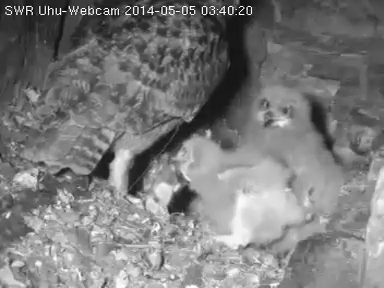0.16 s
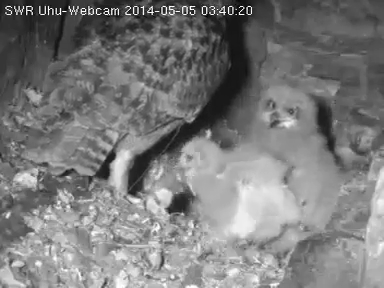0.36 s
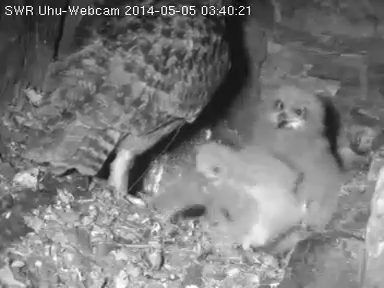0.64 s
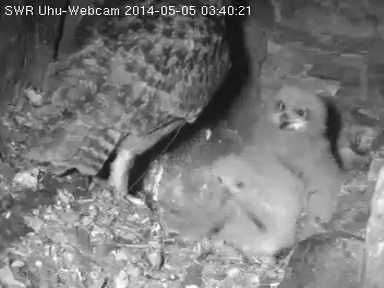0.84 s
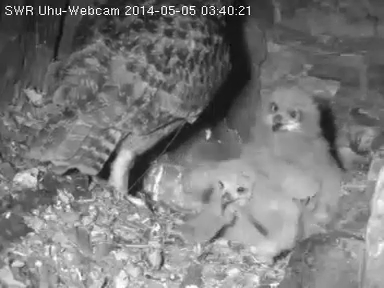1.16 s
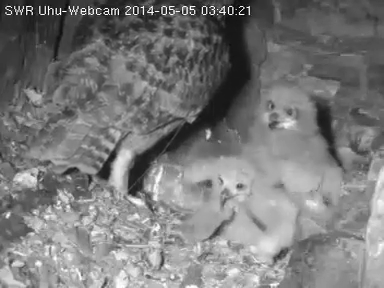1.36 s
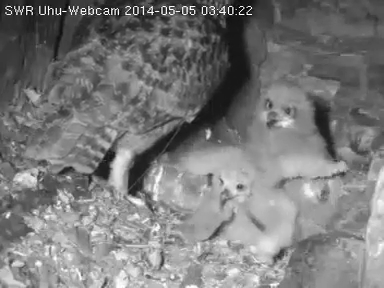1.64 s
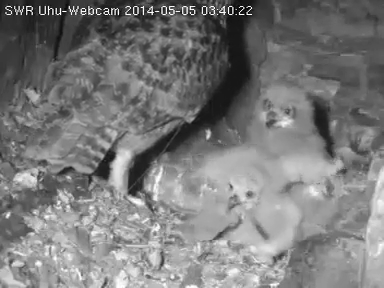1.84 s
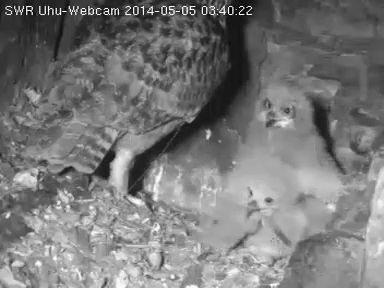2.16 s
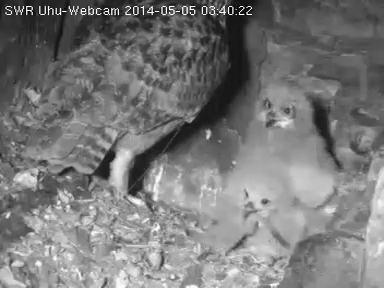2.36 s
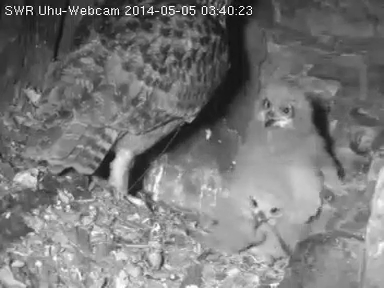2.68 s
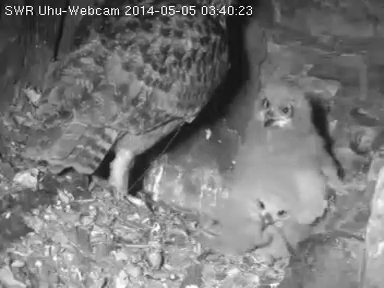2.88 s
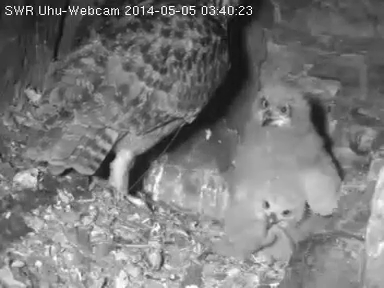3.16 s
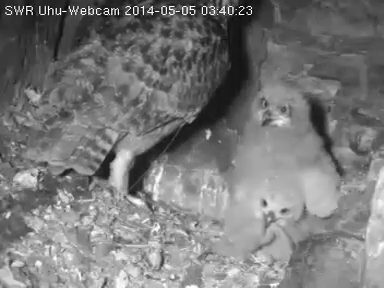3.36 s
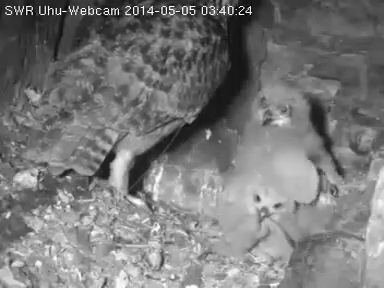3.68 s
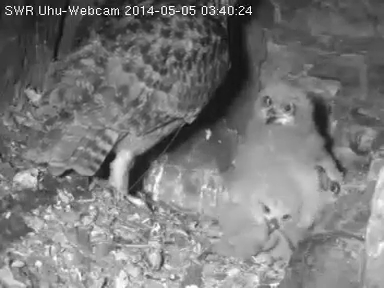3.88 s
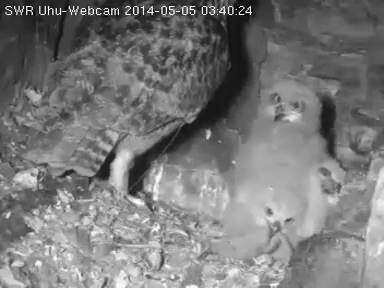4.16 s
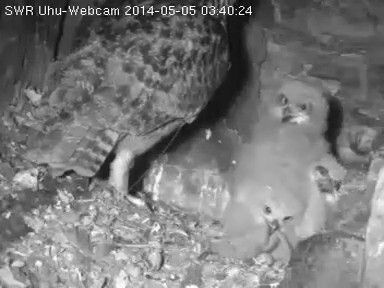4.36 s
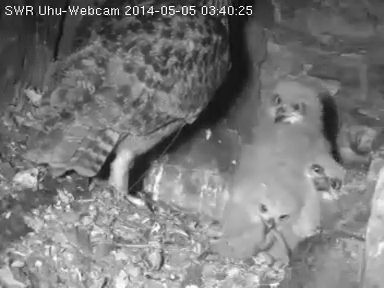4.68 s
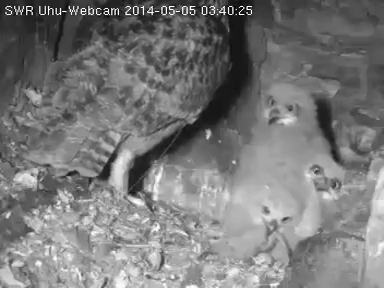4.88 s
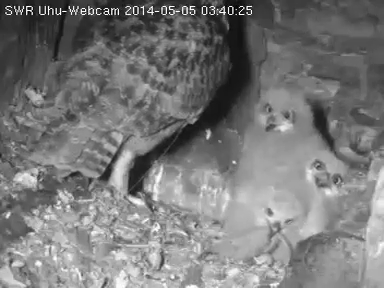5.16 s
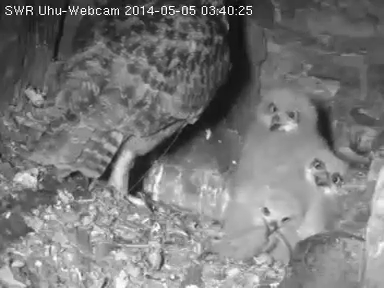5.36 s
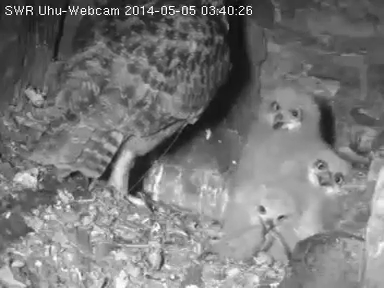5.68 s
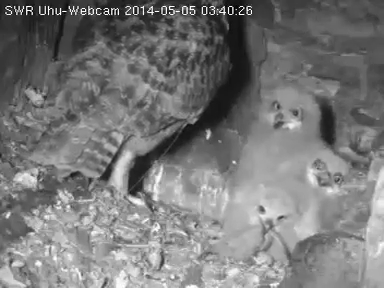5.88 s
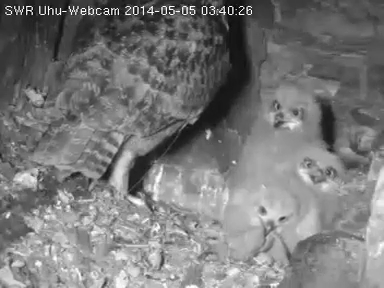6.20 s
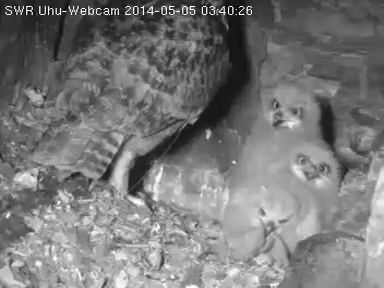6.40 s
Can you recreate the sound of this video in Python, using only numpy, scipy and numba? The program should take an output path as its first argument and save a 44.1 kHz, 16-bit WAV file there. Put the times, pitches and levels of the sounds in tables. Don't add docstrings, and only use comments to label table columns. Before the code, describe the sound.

Owl chicks beg in a close rock nest at night. A couple of soft foot thuds and a faint feather rustle come first, then one loud, raspy screech that swells and closes on a falling whistle. After a pause another chick twitters four tiny high squeaks with hoarse croaks, and a second rasp follows. A cheap surveillance microphone adds constant low hum and dull hiss.

```python
import sys
import numpy as np
from scipy import signal
from scipy.fft import rfft, irfft, next_fast_len
from scipy.io import wavfile
from scipy.ndimage import uniform_filter1d
from numba import njit

SR = 44100
rng = np.random.default_rng(int(sys.argv[2]) if len(sys.argv) > 2 else 0)


def nominal_scale(level):
    x = np.asarray(level, float) / 20
    return 10 ** x


def unload_wav(signal):
    wavfile.write(
        sys.argv[1],
        SR,
        np.round(np.clip(np.atleast_2d(signal).T, -1, 1) * 32767).astype(np.int16),
    )


N = 288061


def rms_one(x):
    return x / np.sqrt(np.mean(x ** 2) + 1e-20)


def in_time(rows):
    s, *columns = np.transpose(rows)
    at = np.arange(int(s[0] * SR), int(s[-1] * SR))
    return at, [np.interp(at / SR, s, column) for column in columns]


def at_hz(points, hz):
    points = np.array(points)
    return np.interp(np.log(hz), np.log(points[:, 0]), points[:, 1])


def colour(x, points):
    size = next_fast_len(x.shape[-1])
    hz = np.arange(size // 2 + 1) * SR / size + 1e-3
    shaped = irfft(rfft(x, size) * nominal_scale(at_hz(points, hz)), size)
    return shaped[..., :x.shape[-1]]


def flutter(size, hz):
    r = np.exp(-2 * np.pi * hz / SR)
    noise = rng.standard_normal(size + 500)
    return rms_one(signal.lfilter([1], [1, -2 * r, r * r], noise)[500:])


@njit
def resonate(x, hz, r):
    y = np.zeros(len(x))
    for i in range(2, len(x)):
        drive = (1 - r * r) / 2 * (x[i] - x[i - 2])
        y[i] = drive + 2 * r * np.cos(2 * np.pi * hz[i]) * y[i - 1] - r * r * y[i - 2]
    return y


def steady_ring(x, hz, width_hz):
    return resonate(x, np.full(len(x), hz / SR), np.exp(-np.pi * width_hz / SR))


def twice(x, hz, width_hz):
    r = np.exp(-np.pi * 1.5 * width_hz / SR)
    return rms_one(resonate(resonate(x, hz / SR, r), hz / SR, r))


def glides(rows, attack, release, sag_db, edge_db, bend):
    u = np.linspace(0, 1, 41)
    swell_db = np.interp(u, [0, attack, 1 - release, 1], [edge_db, 0, sag_db, sag_db + edge_db])
    return [np.transpose([s + length * u, from_hz + (to_hz - from_hz) * u ** bend, peak_db + swell_db])
            for s, length, from_hz, to_hz, peak_db in rows]


def sing(tables, overtones, step_db, shrill_db, shimmer_db, jitter):
    out = np.zeros(N)
    for rows, extra_db in zip(tables, np.broadcast_to(shrill_db, len(tables))):
        at, (hz, level_db) = in_time(rows)
        hz = uniform_filter1d(hz, size=130, mode="nearest")
        hz = hz * (1 + jitter * flutter(len(at), 280))
        phase = 2 * np.pi * np.cumsum(hz) / SR
        wave = np.sin(phase)
        waver_db = np.clip(5.5 * flutter(len(at), 500), -9, 5)
        for k in range(2, 5):
            multiple_db = at_hz(overtones, k * hz) + step_db * (k - 2) + extra_db + waver_db
            wave += nominal_scale(multiple_db) * np.sin(k * phase)
        out[at] += np.sqrt(2) * nominal_scale(level_db + shimmer_db * flutter(len(at), 450)) * wave
    return out


def background():
    # multiple of the mains pitch, level in dB rms.
    hum_tones = [(1, -74), (3, -65), (5, -82), (9, -75), (13, -82)]
    # pitch in Hz, hiss strength in dB per Hz.
    hiss_colour = [(22, -19.5), (45, -5), (90, -4.5), (135, -5), (175, 3), (225, -8.5), (350, -5),
                   (460, -2), (560, -6), (700, -9), (1080, -7.5), (1600, -12.5), (3000, -18), (6500, -22)]
    mains_hz, hiss_db = 50.0, -62.5
    t = np.arange(N) / SR
    hum = np.zeros(N)
    for multiple, tone_db in hum_tones:
        turns = round(multiple) * mains_hz * t + rng.random()
        hum += np.sqrt(2) * nominal_scale(tone_db) * np.sin(2 * np.pi * turns)
    hiss = colour(rng.standard_normal(N), hiss_colour)
    hiss = colour(hiss, [(9000, 6.5), (10000, -49)])
    return hum + nominal_scale(hiss_db) * rms_one(hiss)


def thuds():
    # start in seconds, ring in Hz, peak in dB, time to fall by 60 dB in seconds.
    bumps = [
        (.523, 175, -46, .1),
        (.523, 290, -48, .05),
        (.523, 115, -52, .07),
        (.562, 165, -49, .09),
        (.75, 190, -54, .08),
        (.795, 80, -60, .1),
        (.858, 180, -54, .07),
        (4.11, 178, -55, .08),
    ]
    out = np.zeros(N)
    for s, ring_hz, peak_db, t60 in bumps:
        t = np.arange(int(t60 * SR)) / SR
        swell = nominal_scale(peak_db - 60 * t / t60) * (1 - np.exp(-t / .002))
        out[int(s * SR):][:len(t)] += swell * np.sin(2 * np.pi * ring_hz * t)
    return out


def feathers():
    # start in seconds, length in seconds.
    rustle_times = [
        (.738, .025),
        (.775, .065),
        (.73, .14),
    ]
    # centre in Hz, width in Hz, level in dB.
    rustle_colours = [
        (6018.5, 2000, -63.5),
        (3000, 2600, -62.5),
        (343, 260, -60.5),
    ]
    out = np.zeros(N)
    for (s, length), (centre_hz, width_hz, level_db) in zip(rustle_times, rustle_colours):
        size = int(length * SR)
        grains = rng.standard_normal(8000)[:size] * nominal_scale(3.0 * flutter(8000, 200)[:size])
        swell = rms_one(steady_ring(grains, centre_hz, width_hz)) * np.hanning(size)
        out[int(s * SR):][:size] += nominal_scale(level_db) * swell
    return out


def squeaks():
    # time in seconds, pitch in Hz, level in dB.
    held = [
        (3.6535, 3000, -60),
        (3.655, 3040, -38),
        (3.6685, 2900, -37),
        (3.672, 2790, -46),
        (3.6755, 2700, -37),
        (3.685, 2790, -37.5),
        (3.692, 3350, -33),
        (3.6955, 3900, -49),
        (3.7, 4500, -63),
    ]
    # start in seconds, length in seconds, from Hz, to Hz, peak in dB.
    drops = [
        (3.778, .026, 3810, 2237, -39),
        (3.8965, .022, 3920, 2274, -36),
        (4.016, .018, 3600, 2170, -41),
    ]
    flicks = [
        (3.807, .015, 2760, 4760, -37.5),
        (3.933, 0.017, 2720, 4670, -35),
    ]
    shrillness = [-10, -4, -2]
    # pitch in Hz, level in dB against the basic tone.
    overtones = [(4600, -11), (5400, -23), (6200, -9), (6900, -23), (7500, -15), (8300, -5.5)]
    tables = [held]
    tables += glides(drops, attack=.2, release=.12, sag_db=-14, edge_db=-20, bend=.55)
    tables += glides(flicks, attack=.2, release=.45, sag_db=-6, edge_db=-24, bend=1.4)
    shrill_db = np.repeat(shrillness, [1, len(drops), len(flicks)])
    return sing(tables, overtones, -22, shrill_db, shimmer_db=.8, jitter=.005)


def croaks():
    # start in seconds, length in seconds, from Hz, to Hz, peak in dB.
    croak_notes = [
        (3.917, .016, 1780, 1700, -53),
        (3.918, .014, 3350, 3480, -57),
        (4.032, .03, 1800, 1600, -47),
        (4.034, .042, 2120, 1730, -47),
        (4.042, .018, 900, 870, -60),
        (4.036, .04, 4100, 3300, -56),
    ]
    # pitch in Hz, level of a multiple in dB against the basic tone.
    overtones = [(1800, -5), (3400, -10), (4200, -10), (5200, -23), (6300, -20)]
    tables = glides(croak_notes, attack=.2, release=.3, sag_db=-4, edge_db=-13, bend=1.3)
    return sing(tables, overtones, -4.5, 0, shimmer_db=2.2, jitter=.03)


def whistles():
    # start in seconds, length in seconds, from Hz, to Hz, peak in dB.
    openings = [
        (1.069, .027, 1500, 2280, -44),
        (4.912, .035, 1500, 2420, -47),
    ]
    closings = [
        (1.412, .029, 1680, 1200, -36),
        (5.255, .031, 1690, 1180, -35),
        (5.289, .012, 1080, 900, -58),
    ]
    strands = [
        (1.084, .016, 2600, 3500, -44),
        (1.155, .07, 5200, 5020, -51),
        (1.385, .029, 2830, 2450, -34),
        (4.933, .042, 2900, 4450, -45),
        (4.955, .035, 2500, 3000, -44),
        (5.215, .046, 2860, 2360, -34),
    ]
    chest_strands = [
        (4.96, .11, 760, 760, -51),
        (4.98, .05, 950, 950, -50),
        (5.1, .08, 960, 840, -45),
        (5.08, .15, 1220, 1120, -48),
    ]
    # pitch in Hz, level in dB against the basic tone.
    overtones = [(2400, -16.5), (2800, -7), (3200, -4), (3600, -10), (4300, -11.5), (5000, -20), (6400, -8),
                 (8000, -19.5)]
    step_db = -18
    ends = glides(openings, attack=.22, release=.25, sag_db=.5, edge_db=-20, bend=.7)
    ends += glides(closings, attack=.25, release=.2, sag_db=-7, edge_db=-14, bend=1.05)
    locked = dict(attack=.35, release=.25, sag_db=.5, edge_db=-14, bend=1.2)
    out = sing(ends, overtones, step_db, -2, shimmer_db=1.5, jitter=.006)
    out += sing(glides(strands, **locked), overtones, step_db, -14, shimmer_db=3.0, jitter=.015)
    out += sing(glides(chest_strands, **locked), overtones, step_db, -14, shimmer_db=2.5, jitter=.045)
    return out


def slapping_membrane(size):
    slaps_per_s, unevenness, breath = 1500, .5, .6
    gaps = SR / slaps_per_s * np.exp(unevenness * rng.standard_normal(2000))
    slaps = np.bincount(np.cumsum(gaps).astype(int))[:size]
    return rms_one(slaps - slaps.mean()) + breath * rng.standard_normal(size)


def tract(source, opening, modes):
    out = 0
    for k, (shut_hz, open_hz, width_hz, ring_db) in enumerate(modes):
        ring_hz = shut_hz + (open_hz - shut_hz) * opening
        out = out + (-1) ** k * nominal_scale(ring_db) * twice(source, ring_hz, width_hz)
    return out


def even(x):
    evening = .3
    power = uniform_filter1d(rms_one(x) ** 2, size=300)
    return rms_one(x / (power + .05) ** (evening / 2))


def rasps():
    # time in seconds, effort in dB, beak opening 0-1,
    # mouth ring in Hz set by the tongue.
    efforts = [
        [(1.078, -58, 0.77, 5370), (1.092, -43.5, 0.73, 5270), (1.14, -38, 0.71, 5220),
         (1.172, -40.5, 0.99, 5140), (1.244, -30, 0.83, 4960), (1.334, -26.5, 0.84, 4990),
         (1.408, -37, 0.35, 5030), (1.417, -47, .2, 4680)],
        [(4.922, -64, 0.019, 4170), (4.942, -38.5, .4, 4470), (4.962, -39, 1, 4420), (5.02, -33.5, 0.75, 5220),
         (5.142, -25.5, 0.98, 5040), (5.224, -31, 0.54, 5040), (5.24, -40.5, 0.96, 5300),
         (5.261, -48, 0.03, 4890)],
    ]
    # muffling in dB, clearing time in seconds,
    # nasal notch in Hz, notch depth 0-1 at the start, notch depth 0-1 at the end.
    clearing = [
        (-13, .09, 4780, .95, .1),
        (1, .09, 5820, .95, .7),
    ]
    # Hz beak shut, Hz beak open, width in Hz, level in dB.
    body = [(309, 333, 300, -0.15), (490, 670, 258, 0.15)]
    chest = [(750, 780, 76, -5), (920, 973, 150, -7), (1270, 1270, 220, -4.5), (1640, 1690, 380, 6),
             (2020, 1960, 390, -8.5)]
    throat_rings = [(2520, 2850, 270, 2.5), (3000, 3420, 320, -2.5)]
    pharynx = [(3700, 3950, 540, 0.5), (4080, 4220, 460, -0.5)]
    upper_rings = [(5670, 5660, 360, -6), (6540, 6900, 1730, -5)]
    # (dB at full effort, dB gained per dB below full effort)
    laws = [(-11.5, .19), (-9, .32), (-11.5, .4), (-24, .85)]
    full_db, mouth_db, mouth_width_hz = -25, 1.5, 310
    shut_db = -11.5
    notch_width_hz, notch_shuts_s = 300, .16
    out = np.zeros(N)
    for rows, (muffle_db, clear_s, notch_hz, first, last) in zip(efforts, clearing):
        at, (level_db, opening, mouth_hz) = in_time(rows)
        t = (at - at[0]) / SR
        opening = opening + .08 * flutter(len(at), 45)
        muffled_db = muffle_db * np.clip(1 - t / clear_s, 0, 1)
        slack_db = np.minimum(full_db - level_db, 16)
        pharynx_db, upper_db, chest_db, body_db = [full + gain * slack_db for full, gain in laws]
        source = slapping_membrane(len(at))

        mouth = nominal_scale(mouth_db + muffled_db) * twice(source, mouth_hz, mouth_width_hz)
        upper = mouth - tract(source, opening, upper_rings)
        throat = rms_one(tract(source, opening, throat_rings))
        throat = throat + nominal_scale(pharynx_db) * rms_one(tract(source, opening, pharynx))
        shutting_db = shut_db * (1 - opening) * (t > clear_s)
        voice = even(throat) + nominal_scale(upper_db + muffled_db + shutting_db) * even(upper)
        voice -= nominal_scale(chest_db) * even(tract(source, opening, chest))
        voice -= nominal_scale(body_db) * rms_one(tract(source, opening, body))

        depth = last + (first - last) * np.exp(-(t / notch_shuts_s) ** 4)
        voice -= np.clip(depth, 0, 1) * steady_ring(voice, notch_hz, notch_width_hz)
        edge = np.clip(np.minimum((at - at[0]) / .01, (at[-1] - at) / .003) / SR, 0, 1)
        surge_db = 1.1 * flutter(len(at), 76)
        out[at] += edge * nominal_scale(level_db + surge_db) * voice
    return out


def niche(x):
    t60 = .065
    t = np.arange(int(.15 * SR)) / SR
    tail = rng.standard_normal(len(t)) * nominal_scale(-60 * t / t60) * (t > .003)
    tail = colour(tail, [(1500, -14), (2950, -13), (3350, -1), (4000, -3), (4800, -6), (5400, -6),
                         (6200, 1.5), (8200, -1)])
    return signal.fftconvolve(x, tail / np.sqrt(np.sum(tail ** 2) / 6))[:N]


def scene():
    # pitch in Hz, level in dB.
    scene_colour = [(40, -28.5), (70, -1), (7450, 0.5), (7800, -4.5), (8000, -28), (8300, 9), (8850, 6)]
    beggar = rasps() + whistles()
    beggar -= 0.92 * steady_ring(beggar, 1440, 110)
    twitter = squeaks() + croaks()
    walls = niche(nominal_scale(-26) * beggar + nominal_scale(-16.5) * twitter)
    nest = thuds() + feathers()
    return (colour(beggar + twitter + walls + nest, scene_colour) + background())[None]


def low_pass(x):
    return signal.sosfilt(signal.butter(12, 8990, fs=SR, output="sos"), x)


def record(dry):
    # pitch in Hz, level in dB.
    roll_off = [(6800, -0.5), (7450, -2), (7900, -6), (8300, -13), (8700, -28), (9000, -24.5), (9400, -60)]
    # start in seconds, end in seconds.
    dropouts = [
        (1.235, 1.415),
        (5.14, 5.245),
    ]
    low, high = 7580, 8460
    wet = colour(dry, roll_off)
    t = np.arange(N) / SR
    band = colour(wet, [(low - 40, -90), (low, 0), (high, 0), (high + 40, -90)])
    gate = sum(np.clip(np.minimum(t - start, end - t) / .012 + .5, 0, 1) for start, end in dropouts)
    return low_pass(wet - np.sin(gate * np.pi / 2) ** 2 * band)


dry = scene()
out = record(dry)
unload_wav(out)
```